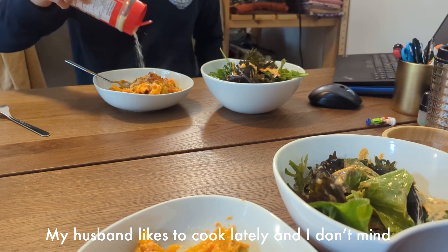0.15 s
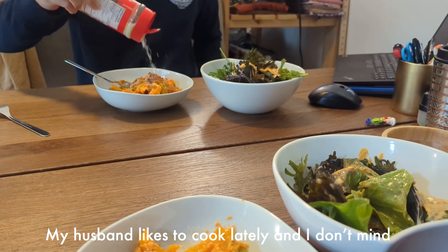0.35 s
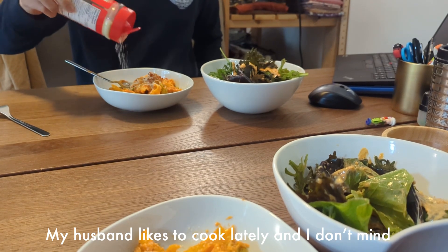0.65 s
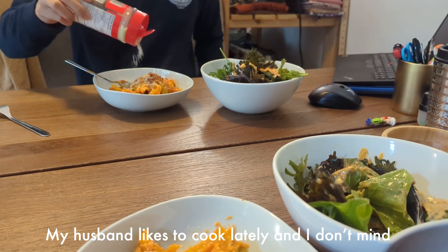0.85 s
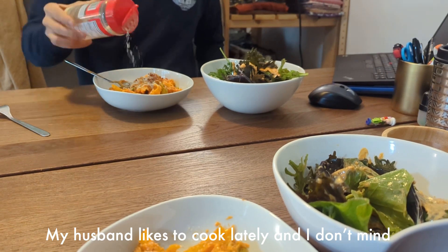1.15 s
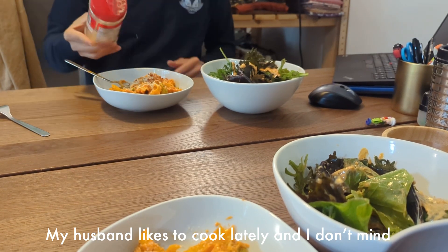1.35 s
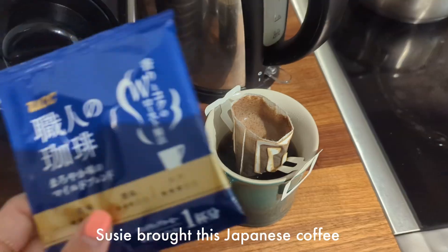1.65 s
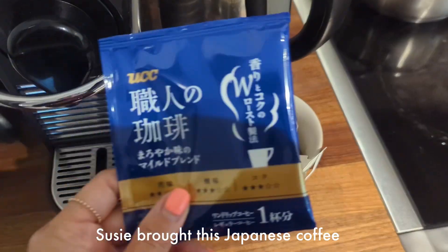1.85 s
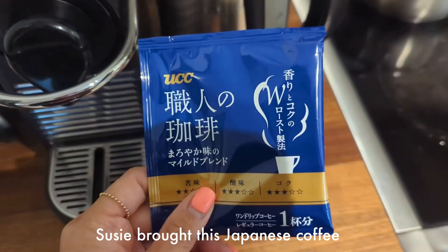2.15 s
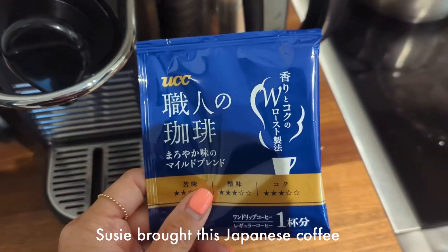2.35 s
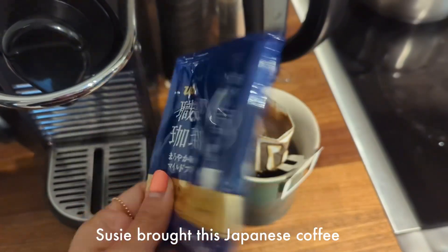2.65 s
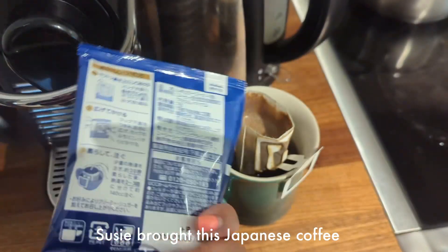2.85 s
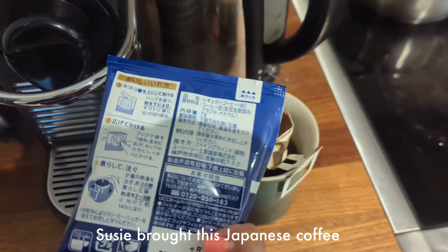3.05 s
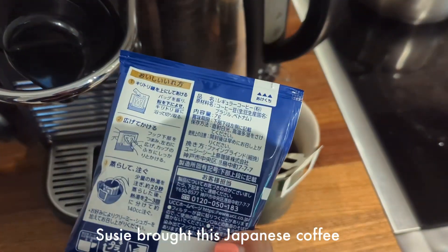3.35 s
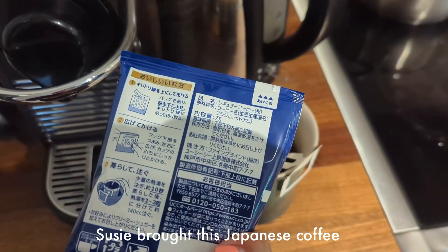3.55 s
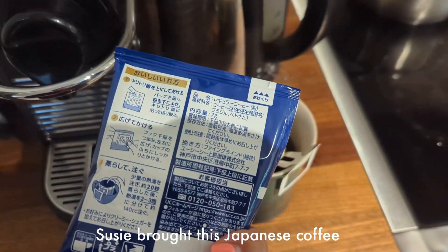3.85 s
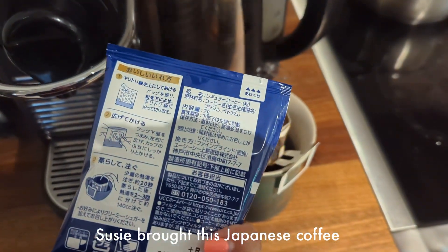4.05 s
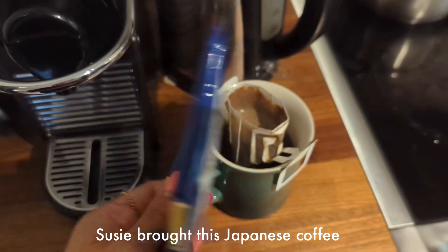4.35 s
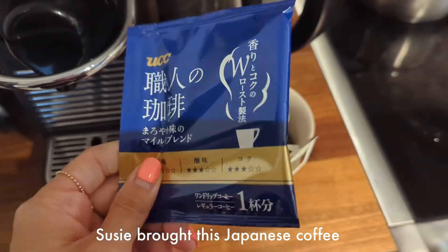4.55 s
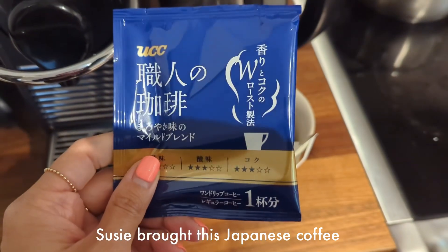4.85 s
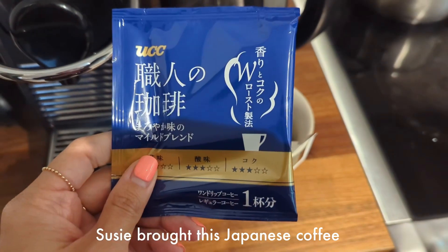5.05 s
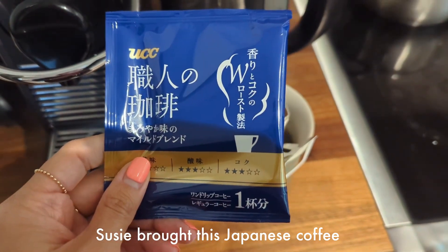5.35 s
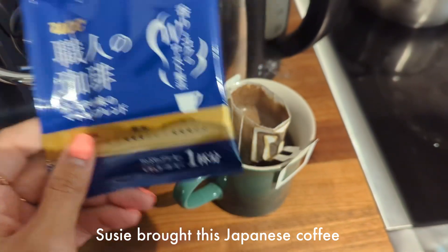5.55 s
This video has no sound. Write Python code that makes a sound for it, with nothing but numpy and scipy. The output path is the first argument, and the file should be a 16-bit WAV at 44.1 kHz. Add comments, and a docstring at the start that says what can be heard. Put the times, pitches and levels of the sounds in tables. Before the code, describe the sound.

Handheld phone sound in two rooms. First comes a dull bassy room tone with light taps and a hint of shaken seasoning. It stops abruptly for a moment, then a deep fluttering motor hum fills a small kitchen with short reflections. Bright, dry foil snaps come in two clusters, very close and wide in stereo, between quieter stretches of hum, with slight finger rubs near the end.

```python
"""A foil sachet, turned over twice by a hand close to the phone, snaps and crackles into a small kitchen:
noise bursts and hails of clicks ring broad resonances. An appliance motor hums there in two beating tones.
Before it, cut off by a short silence, a quiet dining room rumbles while a shaker is tipped.
Taps, bumps, swishes and rubs are shaped noise puffs; the air of both rooms is coloured, flickering noise."""
import sys
import numpy as np
from scipy import signal
from scipy.fft import rfft, irfft, next_fast_len
from scipy.io import wavfile
from scipy.ndimage import uniform_filter1d

SR = 44100
rng = np.random.default_rng(int(sys.argv[2]) if len(sys.argv) > 2 else 0)


def generate_wav(sig):
    """Save sig (samples, or channels by samples) to the path in sys.argv[1] as 16-bit PCM at SR."""
    pcm = np.round(np.clip(np.atleast_2d(sig).T, -1, 1) * 32767).astype(np.int16)
    wavfile.write(sys.argv[1], SR, pcm)


def volts_from_decibels(level):
    """Turn decibel levels (scalar or array-like) into linear amplitude factors."""
    exponent = np.asarray(level, float) / 20
    return 10 ** exponent


N = 251811


def unit(x):
    """Scales to rms 1."""
    return x / np.sqrt(np.mean(x ** 2))


def pan(db):
    """Gains of left and right for a level difference, left minus right."""
    return volts_from_decibels(np.array([[db / 2], [-db / 2]]))


def ring(x, hz, width_hz):
    """A broad resonance with steep flanks, as a band-pass of gain 1 at the centre."""
    low_hz = np.sqrt(hz ** 2 + width_hz ** 2 / 4) - width_hz / 2
    high_hz = min(low_hz + width_hz, 0.45 * SR)
    return signal.sosfilt(signal.butter(2, [low_hz, high_hz], "band", fs=SR, output="sos"), x)


def sachet():
    """Foil snaps and crackle; the sound reaches the right port later than the left."""
    far_port_s = 0.0005
    left, right = snaps() + crackle()
    return np.array([left, np.roll(right, int(far_port_s * SR))])


# Foil resonances. Each row: centre in Hz, width in Hz, left minus right in dB, share in the crackle in dB.
FOIL = [(337, 540, 5.5, -14.5), (950, 1300, 1.5, -22), (2600, 1400, -5, -5), (4700, 1500, -8, -9.5),
        (7650, 2620, -8, -4), (12730, 2700, 11, -10)]
# Foil snaps. Each row: start in seconds, rms over 5 ms in dB, brightness in dB per octave,
# focus on the middle in dB per octave squared (below 0 acts as 0), time constant in ms (at least 0.25).
SNAPS = [(2.0177, -56, -2, -3.5, 0.39), (2.5665, -58.5, 2.5, 3, 0.92), (2.5814, -54, 4, -2.2, .4),
         (2.6106, -38.5, 7.5, 1.5, 0.47), (2.6733, -43, 4.5, 6, 1), (2.6825, -38.5, 3.5, -0.7, .87),
         (2.7075, -43, 2.5, 1, .87), (2.711, -39, 1.5, .1, 1.2), (2.7242, -38, 0.4, 3, .9),
         (2.7322, -33, 0.66, 1.4, .8), (2.7357, -36, 3, -0.5, .4), (2.7426, -40.5, -2.5, 1.7, .65),
         (2.8585, -41.5, 1.9, 0.5, 0.27), (4.2383, -41.5, 2.5, -1.9, 0.4), (4.2933, -34.5, 0.5, 3, 1.2),
         (4.3712, -52, -1.5, 1, 0.82), (4.3813, -47, 2.5, 3, 0.65), (4.4056, -35, 4.5, 1.5, 0.43),
         (4.4314, -50, 6.5, 0.2, 0.44), (4.4404, -39.5, 1.3, -2.3, .78), (4.4467, -45.5, -3, -5, 1.1),
         (4.468, -51.5, -0.2, -1.5, .48), (4.4873, -45, -2, 0, 1.6), (4.5051, -50, 0.5, -4.3, .85),
         (4.5427, -61.5, 3, 1, 0.41), (4.6192, -44, -1, 3, .4), (4.635, -36, -1, 1, .95),
         (5.6603, -64, -5, 2, 0.84)]
# Share of a snap in each foil resonance but the lowest. Each entry: level in dB.
SNAP_SHARE_DB = [-10, -2.5, -4, -1.8, -5.5]


def snaps():
    """Buckling foil: each short noise burst rings the upper resonances, tilted by its brightness."""
    u = np.arange(800) / SR
    out = np.zeros((2, N + len(u)))
    for start_s, db, bright_db, focus_db, ms in SNAPS:
        both, left, right = rng.standard_normal((3, len(u)))
        age = u / (max(ms, 0.25) / 1000)
        shape = age * np.exp(-age - age ** 2 / 8)
        push = shape * (0.75 * both + 0.65 * np.array([left, right]))
        snap = 0
        for k, ((hz, width_hz, pan_db, _), share_db) in enumerate(zip(FOIL[1:], SNAP_SHARE_DB)):
            # neighbours swing in opposite sense, so no hole opens between them
            mode = unit((-1) ** k * ring(push, hz, width_hz) * pan(pan_db))
            octaves = np.log2(hz / 4000)
            tilt_db = bright_db * octaves - max(focus_db, 0) * octaves ** 2
            snap = snap + volts_from_decibels(share_db + tilt_db) * mode
        rms_5ms = np.sqrt(np.sum(snap ** 2) / 2 / (0.005 * SR))
        i = int(start_s * SR)
        out[:, i:i + len(u)] += volts_from_decibels(db) * snap / rms_5ms
    return out[:, :N]


def crackle():
    """Small creases: a hail of tiny clicks, a few much louder, over a fine rustle, rings the whole foil."""
    t = np.arange(N) / SR
    clicks_per_s, click_decay_s = 500, 0.0012
    clicks = (rng.random(N) < clicks_per_s / SR) * volts_from_decibels(2.5 * rng.exponential(size=N))
    clicks = np.minimum(clicks, 10)
    hail = np.convolve(clicks, np.exp(-t[:200] / click_decay_s))[:N]
    strength = unit(hail + 1)  # the 1 is the fine rustle
    both, left, right = rng.standard_normal((3, N))
    push = strength * (0.53 * both + 0.92 * np.array([left, right]))
    out = 0
    for k, (hz, width_hz, pan_db, share_db) in enumerate(FOIL):
        mode = (-1) ** k * unit(ring(push, hz, width_hz))
        out = out + tail_level(hz) * volts_from_decibels(share_db) * mode * pan(pan_db)
    return out


# Crackling tails around the snaps. Each row: start of full level in seconds, hold in seconds, level in dB,
# brightness in dB per octave.
TAILS = [(2.562, .02, -65, 5.5), (2.59, .04, -55.5, -0.5), (2.685, .01, -57.5, 0.25), (2.71, .035, -49, 0),
         (2.768, 0.026, -60.5, -3), (2.852, 0.018, -66, -0.8), (4.245, 0.012, -59, 1),
         (4.295, 0.027, -56, 0.7), (4.375, .015, -57, -1.5), (4.418, 0.033, -55, -1.5),
         (4.484, 0.014, -62.5, 0.7), (4.562, 0.0053, -78, 6), (4.641, 0.018, -58.5, -4.5)]


def tail_level(hz):
    """Level of the crackle near hz: each tail rises quickly, holds, then dies away more slowly."""
    t, out = np.arange(N) / SR, np.zeros(N)
    rise_s, fall_s = 0.0067, 0.021  # widths of the bell-shaped flanks
    octaves = np.log2(max(hz, 2000) / 4000)
    for start_s, hold_s, db, bright_db in TAILS:
        near = slice(int((start_s - 0.1) * SR), int((start_s + 0.3) * SR))
        early = np.maximum(start_s - t[near], 0) / rise_s
        late = np.maximum(t[near] - start_s - hold_s, 0) / fall_s
        out[near] += volts_from_decibels(db + bright_db * octaves) * np.exp(-(early ** 2 + late ** 2) / 2)
    return out


def room(x):
    """Dense echoes from the counter and cups close by, then the longer, duller tail of the walls."""
    near_t60_s, near_db = 0.05, -6
    far_t60_s, far_db = 0.28, -13.5
    u = np.arange(int(0.6 * SR)) / SR
    near, far = rng.standard_normal((2, 2, len(u)))
    far = signal.lfilter([0.55], [1, -0.65], far)  # duller
    tail = 0
    for noise, t60_s, db in [(near, near_t60_s, near_db), (far, far_t60_s, far_db)]:
        tail = tail + volts_from_decibels(db - 60 * u / t60_s) * noise / np.sqrt(t60_s * SR / np.log(1e6))
    return x + signal.fftconvolve(x, tail * (u > 0.002), axes=1)[:, :N]


# Motor tones, in two tables. Each entry: frequency in Hz; rms relative to the motor level in dB.
HUM_HZ = [43.34, 56.67, 58.5, 89.29, 120.01, 143.33, 156.66, 240.02, 284.0]
HUM_DB = [-11.5, 1, -26, -34, -24.5, -27, -35.5, -34, -38]
# Motor as heard from the moving phone. Each row: time in seconds, level in dB.
MOTOR = [(1.65, -42), (1.72, -44.5), (2.03, -46.5), (3.82, -43), (4.01, -45), (4.3, -43), (5.53, -46),
         (5.7, -47)]


def motor():
    """Steady sine tones; the two strongest beat thirteen times a second."""
    t = np.arange(N) / SR
    in_step_s, pan_db = 1.858, 2  # all tones crest together at in_step_s
    tones = 0
    for hz, db in zip(HUM_HZ, HUM_DB):
        tones = tones + volts_from_decibels(db) * np.sqrt(2) * np.cos(2 * np.pi * hz * (t - in_step_s))
    level_db = np.interp(t, *np.transpose(MOTOR))
    return tones * volts_from_decibels(level_db) * pan(pan_db)


def puff(peak_s, rise_s, fall_s, hz, width_hz, db):
    """One short puff of noise in a broad resonance, more alike left and right when low."""
    t, out = np.arange(N) / SR, np.zeros((2, N))
    i = max(int((peak_s - 4 * rise_s) * SR), 0)
    j = min(int((peak_s + 6 * fall_s) * SR), N)
    after_s = t[i:j] - peak_s
    shape = np.exp(-np.where(after_s < 0, (after_s / rise_s) ** 2, after_s / fall_s))
    both, left, right = rng.standard_normal((3, j - i))
    noise = both * min(600 / hz, 1) + np.array([left, right]) * min(hz / 600, 1)
    out[:, i:j] = volts_from_decibels(db) * shape * unit(ring(noise, hz, width_hz))
    return out


# Finger taps and knocks. Each row: peak time in seconds, level in dB.
TAPS = [(.24, -69), (.46, -65), (.627, -68), (.728, -67.5), (1.588, -89)]


def taps():
    """Fingers tap or knock: brief puffs around 700 Hz."""
    return sum(puff(s, rise_s=0.0033, fall_s=0.0093, hz=700, width_hz=570, db=db) for s, db in TAPS)


# Soft low bumps. Each row: peak time in seconds, level in dB.
BUMPS = [(3.884, -64), (4.69, -58), (5.452, -60.5), (5.55, -64.5)]


def bumps():
    """Soft bumps: slower puffs in a narrow low band."""
    return sum(puff(s, rise_s=0.0098, fall_s=0.021, hz=185, width_hz=75, db=db) for s, db in BUMPS)


# Swishes of grains and cloth. Each row: peak time in seconds, fall in seconds, level in dB.
SWISHES = [(1.039, 0.033, -89), (1.245, 0.0046, -87), (1.316, 0.008, -77), (1.371, 0.064, -82.5),
           (1.76, 0.049, -83), (5.51, 0.012, -80.5), (5.583, .015, -77.5)]


def swishes():
    """Grains and cloth swish: thin puffs in a wide treble band."""
    return sum(puff(s, 0.6 * fall_s, fall_s, hz=6500, width_hz=4200, db=db) for s, fall_s, db in SWISHES)


# Finger rubs on paper and cup. Each row: peak time in seconds, fall in seconds, centre in Hz, level in dB.
RUBS = [(1.646, 0.082, 1200, -74), (1.92, 0.01, 2500, -84), (2.25, 0.046, 2350, -87),
        (4.828, 0.029, 2400, -80.5), (4.874, 0.018, 2420, -76), (5.342, 0.028, 2600, -73.5),
        (5.34, 0.043, 950, -71.5)]


def rubs():
    """Fingers rub on paper and cup: puffs whose width is a fixed share of their centre."""
    return sum(puff(s, 0.6 * fall_s, fall_s, hz, 0.44 * hz, db) for s, fall_s, hz, db in RUBS)


def walk(rate_hz):
    """Random levels held 1 / rate_hz seconds and slewed twice; spread near 1."""
    k = int(SR / rate_hz)
    held = np.repeat(rng.standard_normal(N // k + 1), k)
    return 1.3 * uniform_filter1d(uniform_filter1d(held, k), k)[:N]


# Likeness of left and right in the air. Each row: frequency in Hz, likeness from 0 to 1.
LIKE = [(60, 0.96), (130, .94), (290, 0.9), (640, 0.2), (1400, 0)]
# Slow treble level of the air. Each row: time in seconds, treble gain in dB.
TREBLE_DRIFT = [(0, 0), (.75, 1.5), (1.0, 3.5), (1.5, 1.5), (1.62, 6), (1.8, 5), (2.1, 1), (4.0, 1.9),
                (4.5, 3), (5.0, 1.5), (5.71, 3.5)]


def air(points, db, bass_pan_db):
    """Coloured noise, alike left and right in the bass; octaves flicker alone and together, treble drifts."""
    size = next_fast_len(N)
    hz = np.maximum(np.arange(size // 2 + 1) * SR / size, 1)
    point_hz, point_db = np.transpose(points)
    like_hz, likeness = np.transpose(LIKE)
    gain = volts_from_decibels(np.interp(np.log(hz), np.log(point_hz), point_db, left=-50))
    like = np.clip(np.interp(np.log(hz), np.log(like_hz), likeness), 0, 1)
    noise = rfft(rng.standard_normal((2, size))) * gain * np.sqrt([1 + like, 1 - like])
    treble_db = np.interp(np.arange(N) / SR, *np.transpose(TREBLE_DRIFT))
    together = walk(13)
    out = 0
    for k in range(10):  # octaves from 32 Hz up
        bass = k < 4
        share = np.clip(1 - abs(np.log2(hz / 32) - k), 0, 1)
        mid, side = irfft(noise * share, size)[:, :N]
        drift_db = treble_db * (-0.17 if bass else 1)  # slight opposite change in the bass
        swell_db = drift_db + 1.3 * walk(7.5) + 1.1 * together
        out = out + volts_from_decibels(swell_db) * np.array([mid + side, mid - side]) * pan(bass_pan_db * bass)
    return out * volts_from_decibels(db) / np.sqrt(np.mean(out.mean(axis=0) ** 2))


# Kitchen air spectrum. Each row: frequency in Hz, relative density in dB per Hz.
KITCHEN = [(25, -41), (36, -29), (48, -10), (62, -14), (80, -19), (100, -22.5), (130, -18.5), (153, -20),
           (175, -32.5), (241, -28.5), (323, -35.5), (444, -37.5), (611, -43), (1500, -57), (2930, -67.5),
           (8000, -76), (15000, -80)]


def kitchen_air():
    """Kitchen background: low-heavy noise."""
    return air(KITCHEN, db=-57, bass_pan_db=0.5)


# Dining room air spectrum. Each row: frequency in Hz, relative density in dB per Hz.
DINING = [(25, -35), (40, -10.5), (62, 2), (90, -10.5), (116, 4.5), (140, -3.5), (165, -7.5), (195, -14),
          (235, -11.5), (290, -19), (510, -25.5), (950, -31.5), (1110, -37.5), (2000, -43.5), (3250, -55),
          (12300, -64), (15000, -69)]


def dining_air():
    """Dining room rumble: low-heavy noise."""
    return air(DINING, db=-53.5, bass_pan_db=-1.5)


def scene():
    """Dining room, silence, kitchen."""
    t = np.arange(N) / SR
    cut_s, back_s = 1.502, 1.578
    first = np.clip((cut_s - t) / 0.00077, 0, 1)
    second = np.clip((t - back_s) / 0.02, 0, 1)
    hum_fade = np.clip((t - back_s) / 0.06, 0, 1)
    rustles = (first + second) * (taps() + bumps() + swishes() + rubs())
    return room(sachet()) + hum_fade * motor() + rustles + second * kitchen_air() + first * dining_air()


def band_limit(x):
    """A steep low-pass at the top of the band."""
    return signal.sosfilt(signal.butter(12, 16640, fs=SR, output="sos"), x)


def record(dry):
    """The phone cuts the top."""
    top_hz, ripple_db = 15300, 0.5
    x = signal.sosfilt(signal.cheby1(4, ripple_db, top_hz, fs=SR, output="sos"), dry)
    return band_limit(x)


dry = scene()
out = record(dry)
generate_wav(out)
```